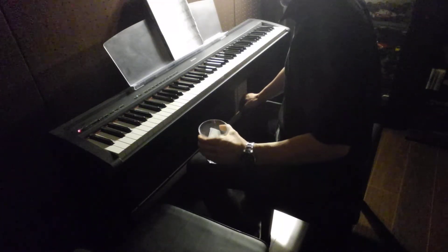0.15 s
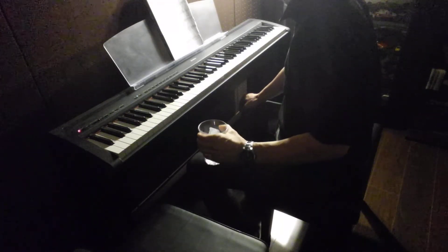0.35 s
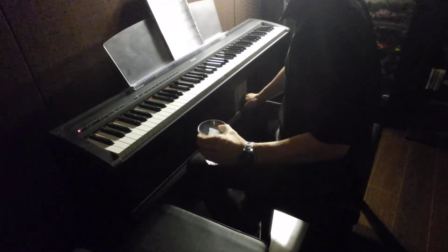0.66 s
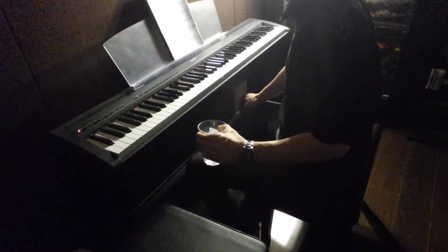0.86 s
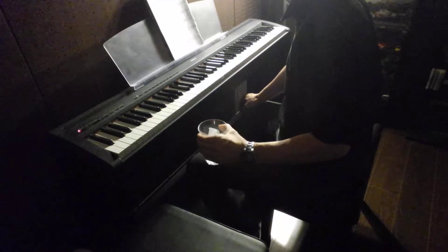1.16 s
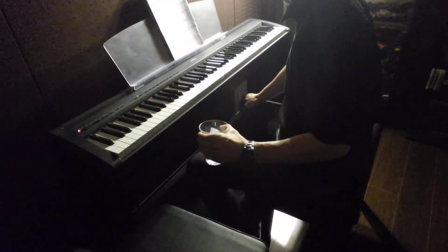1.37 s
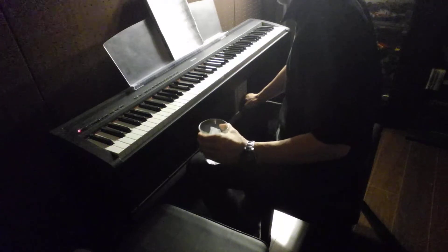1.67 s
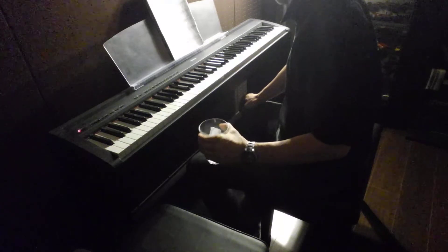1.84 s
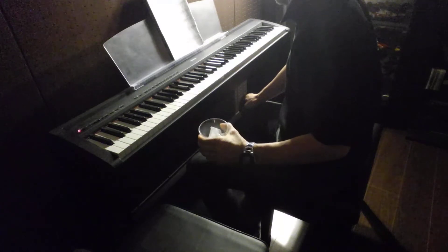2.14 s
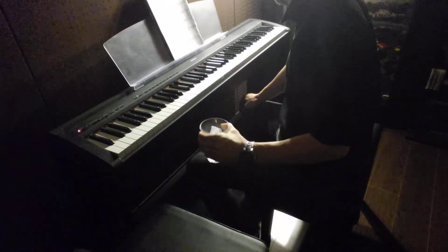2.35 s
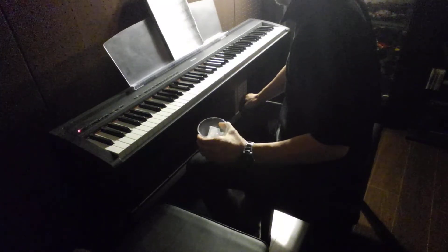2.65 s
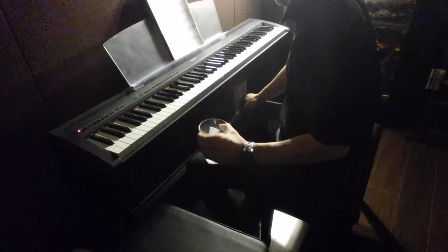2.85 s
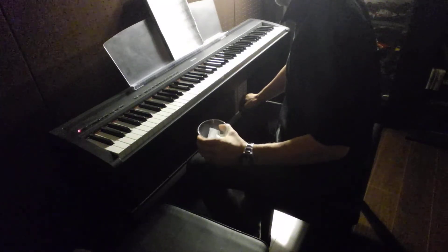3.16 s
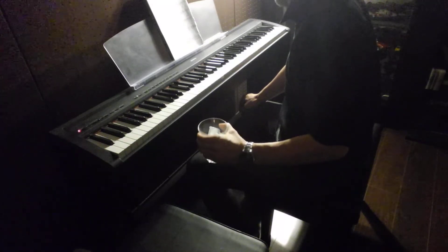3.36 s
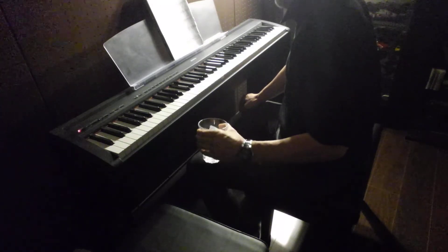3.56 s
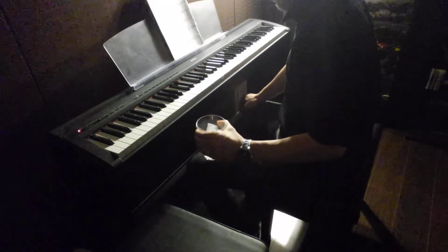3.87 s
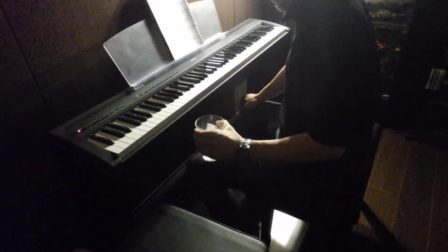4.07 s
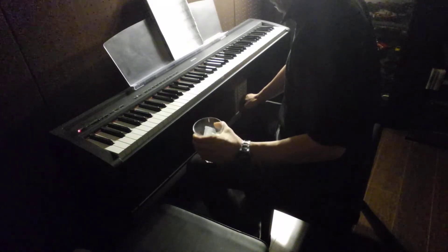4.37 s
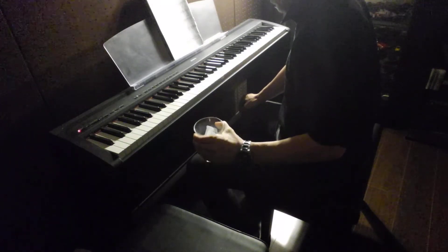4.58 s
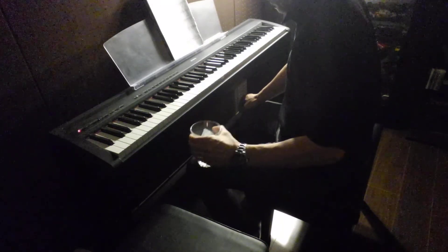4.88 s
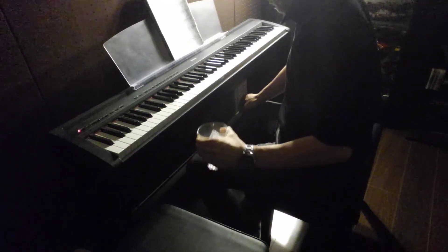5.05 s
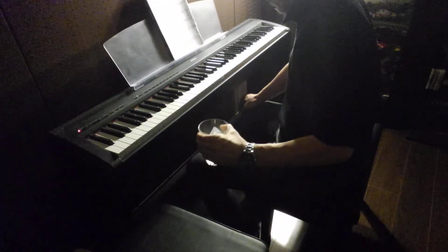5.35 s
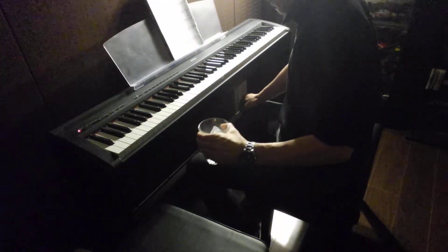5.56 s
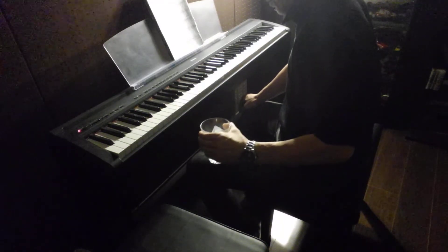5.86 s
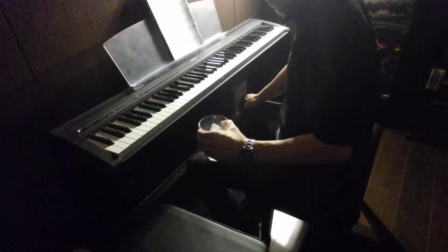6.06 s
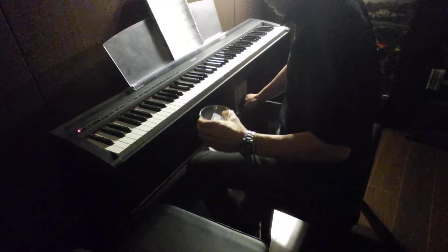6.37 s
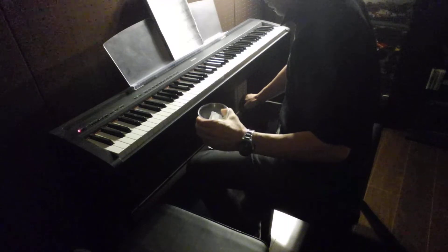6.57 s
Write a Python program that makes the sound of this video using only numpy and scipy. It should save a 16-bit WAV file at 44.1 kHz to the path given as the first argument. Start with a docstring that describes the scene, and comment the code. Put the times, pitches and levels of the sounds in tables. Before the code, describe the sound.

Close, dense clinking of ice in a gripped drinking glass, shaken hard for over four seconds, then gently swirled over faint room hum.

```python
"""Ice cubes knock about in a hand-held glass, shaken hard in a small soft room that hums throughout.
Each blow is a knock of ice, a short ring of the gripped glass and a snap of noise; light touches crowd round it.
A metal wristband soon joins with short ticks of noise, then air gurgles between the cubes as gliding tones.
After about four and a half seconds the hand only swirls the glass gently, and the blows become much softer.
The room answers faintly all along, with sparse echoes that die away."""
import sys
import numpy as np
from scipy import signal
from scipy.fft import rfft, irfft
from scipy.io import wavfile
from scipy.ndimage import uniform_filter1d

SR = 44100
rng = np.random.default_rng(int(sys.argv[2]) if len(sys.argv) > 2 else 0)


def dump_mix(stems):
    """Bounce the given channels to the path in sys.argv[1] as a 16-bit WAV at rate SR."""
    frames = np.atleast_2d(stems).T  # one column per channel
    limited = np.clip(frames, -1, 1)  # hard clip at full scale
    pcm = np.round(limited * 32767).astype(np.int16)
    wavfile.write(sys.argv[1], SR, pcm)


N = 296352  # length in samples


def gain_of(db):
    """Turn decibels into a plain multiplier."""
    return 10 ** (np.asarray(db) / 20)


def evened(x):
    """Scale a sound to an average (RMS) level of 1."""
    return x / np.sqrt(np.mean(x ** 2) + 1e-20)


def peaked(x):
    """Scale a sound so its highest peak is 1."""
    return x / (abs(x).max() + 1e-20)


def read(points, hz):
    """Read a table of (Hz, value) at any pitch, on a logarithmic pitch scale."""
    f, value = np.transpose(points)
    return np.interp(np.log(hz + 1), np.log(f + 1), value)


def add(mix, s, sound):
    """Add a sound into the mix, starting at s seconds."""
    part = mix[round(s * SR):][:len(sound)]
    part += sound[:len(part)]


def colour(x, points):
    """Filter with the given spectrum, never sounding ahead of its input (minimum phase)."""
    hz = abs(np.fft.fftfreq(4096, 1 / SR))
    log_gain = np.log(gain_of(read(points, hz)))
    taps = np.fft.ifft(np.exp(np.conj(signal.hilbert(log_gain)))).real[:2048]
    return signal.oaconvolve(x, taps)[:len(x)]


def ring(t, hz, t60, rise, glide=0):
    """A tone with a soft start that drops 60 dB in t60 seconds; glide bends the pitch up as it fades."""
    fade = gain_of(-60 * t / t60) * (1 - np.exp(-t / rise))
    return fade * np.sin(2 * np.pi * hz * t * (1 + glide * t))


# The tone of the room and microphone noise. Each row: pitch in Hz, relative level in dB.
HUM_TONE = [(12, 3), (33, -2.5), (75, -10), (157, -3.5), (242, -12.5), (503, -13), (700, -19.5),
            (1200, -18.5), (3000, -29.5), (5000, -34), (9300, -41), (16000, -39.5)]


def hum():
    """Steady room rumble and microphone hiss: random noise shaped by pitch."""
    hz = np.fft.rfftfreq(N, 1 / SR)
    noise = irfft(rfft(rng.standard_normal(N)) * gain_of(read(HUM_TONE, hz)), N)
    return gain_of(-60.5) * evened(noise)


# How hard the hand moves the glass, as the middle level of the softer blows.
# Each row: time in seconds, peak level in dB before later filters.
VIGOUR = [(0, -39.5), (1.1, -42), (1.7, -40), (3.3, -42.5), (3.7, -42.5), (4.4, -32), (4.65, -67),
          (5.2, -60), (6.0, -66), (6.72, -59)]


def vigour_db(s):
    """The hand's strength at s seconds, sliding smoothly between the rows."""
    return np.interp(s, *np.transpose(VIGOUR))


def slackness_db(s):
    """How far the hand has eased off from a full shake: 0 or below."""
    full_shake_db = -45.5
    return np.minimum(vigour_db(s) - full_shake_db, 0)


def lesser_blows():
    """Cubes also knock softly at uneven moments, as hard as the hand moves."""
    per_s, spread_db = 28, 7
    slots = np.arange(0, N / SR - .1, 1 / per_s)
    when, size, low, high, hard = rng.random((len(slots), 5)).T
    s = slots + when / per_s  # one blow somewhere in each slot
    peak_db = vigour_db(s) + spread_db * (2 * size - 1)
    low_hz = 2200 + (3100 - 2200) * low
    high_hz = 3440 + (4700 - 3440) * high
    high_db = -19 + (-8 + 19) * hard
    return np.transpose([s, peak_db, low_hz, high_hz, high_db])


# The clear blows of cubes on the glass or one another. Each row: start in seconds, peak level in dB
# before the snap and later filters, lower and upper pitch of the ice knock in Hz,
# upper level relative to the lower in dB before a fixed lift.
CLEAR_BLOWS = [(0.0059, -23.5, 2460, 4300, -6.5), (0.0985, -24.5, 2430, 4370, -3),
               (0.1147, -25, 2770, 4300, 1), (0.2371, -30, 2600, 3830, -13), (0.2596, -24, 2500, 3800, -3),
               (0.2688, -24.5, 3100, 3530, -8), (0.274, -24.5, 2630, 3570, -10),
               (0.317, -29, 2180, 4580, -12), (0.3345, -33, 2200, 3770, -15),
               (0.3516, -27.5, 2440, 3460, -19), (0.3885, -25, 2540, 3480, -20),
               (0.4041, -28.5, 2580, 3450, -6), (0.4126, -32, 2930, 3470, -8),
               (0.4288, -22, 2680, 4620, -6), (0.4397, -27.5, 2620, 4620, 1), (0.451, -21, 2450, 4930, -6),
               (0.488, -25, 2340, 4600, -5), (0.584, -29.5, 2660, 3350, 6), (0.6022, -29, 2350, 4620, -6),
               (0.6128, -24.5, 2330, 4800, -1.5), (0.6387, -33, 2800, 4770, -6),
               (0.684, -35, 2770, 3420, -8), (0.7508, -28, 2400, 3850, -1), (0.7592, -23.5, 2520, 4520, 0),
               (0.7934, -29, 2310, 3400, 2), (0.8271, -29, 2730, 3830, -8),
               (0.8917, -19.5, 2400, 3780, -12), (0.915, -20.5, 2540, 4620, -11),
               (0.9282, -19.5, 2910, 3630, -5), (0.9359, -30, 2660, 4620, -10),
               (0.9465, -24, 2300, 3490, -7), (0.9787, -24, 2760, 4570, -13),
               (0.9977, -30.5, 3000, 3690, -7), (1.0271, -34, 2430, 3520, -11),
               (1.0452, -25.5, 2360, 3370, -7), (1.0736, -21.5, 2620, 3480, -17),
               (1.0893, -16.5, 2260, 4700, -9), (1.1099, -20.5, 2400, 3360, -7),
               (1.155, -25, 2400, 3540, -1), (1.1997, -33, 2800, 3430, -8), (1.2471, -31, 2500, 5200, -17),
               (1.252, -26.5, 2610, 4640, 0), (1.2621, -28, 2950, 3450, -12),
               (1.2665, -22, 2350, 4700, -4.5), (1.405, -24.5, 3020, 4100, -9),
               (1.4222, -22, 2580, 3470, 5), (1.44, -28.5, 2560, 4300, 6), (1.4985, -36.5, 2440, 3630, -4),
               (1.5727, -26, 3400, 5550, -3), (1.586, -31, 3330, 3400, 4), (1.599, -22, 2310, 4750, 2),
               (1.711, -30.5, 2530, 3530, -9), (1.7458, -23, 3010, 3570, -4),
               (1.7576, -24.5, 2950, 3370, 3), (1.7733, -23, 2280, 4800, -15),
               (1.8117, -22, 2190, 4600, -5), (1.8877, -30.5, 2540, 3280, -17),
               (1.8987, -28, 2400, 3800, -9), (1.931, -24.5, 2310, 3540, 0), (1.9416, -24.5, 3000, 3230, 2),
               (1.9476, -22.5, 2490, 4700, -2), (1.962, -33, 2360, 4340, -4), (1.9895, -26, 2730, 4620, -8),
               (2.0037, -31.5, 2700, 3760, -1), (2.0208, -32, 2220, 4150, -8),
               (2.068, -34.5, 2860, 3330, -8), (2.1053, -23.5, 2300, 5290, 3), (2.1155, -23, 2260, 3830, 5),
               (2.1272, -36, 2400, 4620, 4), (2.139, -30, 2350, 4400, 8), (2.1698, -23.5, 2230, 4540, -4),
               (2.258, -33, 2310, 3300, -1), (2.2796, -20, 2410, 4850, -9), (2.2887, -28.5, 2680, 4560, 7),
               (2.301, -23, 2310, 5220, -9), (2.3365, -23.5, 2180, 4600, -5), (2.4367, -33, 3050, 5540, -4),
               (2.4492, -25, 2540, 4330, -4), (2.4632, -26, 2310, 4740, -7), (2.4965, -31, 2280, 4750, -9),
               (2.5246, -30, 2420, 3370, -12), (2.586, -28.5, 2350, 4850, -8),
               (2.6138, -23, 2400, 3800, -4), (2.6307, -23.5, 2320, 4980, 0.5),
               (2.6684, -27, 2230, 3500, -7), (2.6936, -31, 2220, 3470, -10),
               (2.7015, -29, 2240, 4060, -18), (2.7696, -22, 2310, 3860, -3),
               (2.802, -21, 2640, 3480, -7.5), (2.8392, -33, 2420, 3940, -3), (2.8639, -37, 2840, 3500, -9),
               (2.9214, -38, 2440, 4610, -4), (2.9444, -26.5, 2580, 5400, -13),
               (2.9531, -23, 2250, 4750, 6), (2.9636, -27.5, 3000, 4730, -4), (2.9803, -26, 2340, 4640, 3),
               (3.0434, -31, 2370, 4150, -13), (3.0617, -27.5, 2540, 3500, -11),
               (3.0974, -36.5, 2300, 3800, -15), (3.1137, -35, 3000, 4450, 1),
               (3.1245, -25.5, 2400, 6100, -4), (3.138, -22, 2260, 5270, -9), (3.1527, -20, 2950, 4700, -3),
               (3.187, -24.5, 2240, 4600, -8), (3.2094, -31, 2680, 3480, -13),
               (3.236, -31.5, 2620, 4370, -15), (3.2779, -32.5, 2320, 4730, -6),
               (3.2922, -27, 2360, 4620, -13), (3.3, -26.5, 2640, 4620, -8),
               (3.3091, -26.5, 2910, 4620, -3), (3.3191, -24, 2270, 4880, -8), (3.35, -35, 2820, 4640, -7),
               (3.384, -34.5, 2440, 3300, -8), (3.436, -37, 2370, 4700, -4), (3.4663, -30, 2780, 5600, -5),
               (3.4788, -28, 2750, 4450, -8), (3.49, -25.5, 2310, 5030, -10),
               (3.5152, -27.5, 2370, 3970, -9), (3.6365, -29, 2590, 4920, -9),
               (3.6476, -27, 2200, 4840, -2), (3.724, -34.5, 2600, 3480, -11),
               (3.8027, -24, 2770, 3610, -6.5), (3.825, -28, 2340, 4800, 0), (3.8553, -28, 2540, 3670, -9),
               (3.9558, -25.5, 2700, 5610, -8), (3.9812, -27, 2800, 3570, 4.5),
               (3.9881, -23.5, 2840, 4730, -1), (4.02, -33, 2250, 3670, -2),
               (4.0737, -28.5, 2640, 3640, -5), (4.13, -28, 2680, 5970, -4), (4.1462, -27, 2200, 5000, -1),
               (4.1558, -24, 2870, 4960, -4), (4.1646, -24, 2760, 5020, -1.5),
               (4.203, -23.5, 2770, 3800, -0.5), (4.2341, -27, 2780, 4160, -7),
               (4.2916, -29.5, 2360, 4930, -4), (4.3232, -26, 2290, 4600, 0), (4.3373, -24, 3000, 3520, 6),
               (4.3442, -31, 2190, 4850, 8), (4.3858, -23.5, 2910, 3800, -3), (4.4682, -38, 2330, 3620, 9),
               (4.4988, -30.5, 2920, 3650, 8), (4.5084, -25, 2600, 4830, -4.5),
               (4.592, -48, 2540, 3700, -8), (4.6184, -54, 2780, 3520, -6), (4.6773, -45, 2780, 3480, -6),
               (4.7554, -41, 2290, 3520, -20), (4.7618, -32.5, 2200, 3480, -2),
               (4.7762, -32.5, 2870, 3800, -6), (4.8439, -48, 3010, 3320, -1),
               (4.8669, -43.5, 3150, 3300, -8), (4.883, -38, 2800, 3600, -3), (4.9322, -48, 2100, 3430, -4),
               (4.965, -39.5, 2740, 3450, -21), (4.9949, -39, 2700, 3400, -7),
               (5.0221, -37.5, 3260, 4200, -6), (5.0454, -37.5, 2540, 3500, -4),
               (5.0628, -32.5, 2440, 3300, -3.5), (5.1172, -47, 2600, 5690, -12),
               (5.1595, -38, 2660, 3800, -4), (5.1652, -32.5, 2820, 3710, -3), (5.201, -45, 2180, 3840, -6),
               (5.2376, -33, 1930, 3750, -2), (5.2475, -30.5, 1970, 3560, -6),
               (5.2854, -34, 2830, 3450, -5), (5.31, -33, 2780, 3440, -6), (5.347, -38.5, 2820, 4920, -4),
               (5.3598, -43, 3250, 3500, -5), (5.4202, -41.5, 2770, 3560, -8),
               (5.4909, -41, 2940, 3780, -16), (5.5149, -30, 2860, 5040, -6.5),
               (5.637, -37, 2730, 4850, -12), (5.6989, -34.5, 2170, 3430, -14),
               (5.7402, -38, 2040, 3380, -10), (5.746, -31, 2010, 3300, -21), (5.754, -32, 2190, 3520, 5),
               (5.7672, -32, 2220, 3400, -7), (5.7903, -32, 2900, 3480, -8), (5.871, -48, 2700, 6000, -13),
               (5.8916, -37, 2340, 3770, -16), (5.9693, -35, 1960, 3320, -11),
               (5.989, -32, 2010, 3370, -13), (5.9959, -32, 2190, 4860, -1), (6.0529, -39.5, 2860, 4100, 6),
               (6.0882, -44.5, 2910, 3530, -8), (6.1528, -53, 3020, 3300, -6),
               (6.1599, -45, 2800, 3400, -4), (6.179, -37.5, 2170, 4300, -17),
               (6.2216, -42, 2800, 3380, -11), (6.3377, -43, 2840, 3200, -8), (6.4086, -44, 2200, 3250, -9),
               (6.4435, -48, 2180, 3300, -10), (6.4523, -39, 2200, 3200, -10),
               (6.5365, -56, 3090, 3420, -9.5), (6.559, -46, 2200, 3950, -11),
               (6.6485, -45.5, 2060, 3320, -34), (6.7002, -50, 3120, 3990, -4)]


def all_blows():
    """The clear blows together with the softer ones between."""
    return np.vstack([CLEAR_BLOWS, lesser_blows()])


# The tone of the contact snap. Each row: pitch in Hz, gain in dB.
SNAP_TONE = [(800, -26), (1900, -17.5), (2600, 5.5), (6300, -0.5), (7100, -13), (10000, -18.5),
             (16000, -27.5)]


def snap(blows, t60):
    """The contact itself: a very short burst of hiss at each blow."""
    fade = gain_of(-60 * np.arange(600) / SR / t60)
    envelope = signal.oaconvolve(blows, fade)[:N]
    return colour(envelope * rng.standard_normal(N), SNAP_TONE)


# The glass damped by the grip, one row per ringing mode.
# Each row: pitch in Hz before the ice shifts it, relative level in dB, time to drop 60 dB in seconds.
GLASS = [(1420, 2, 0.023), (1690, 1, 0.024), (2190, -9.5, 0.14), (2310, -1, 0.089), (2540, -8.5, 0.057),
         (2770, -8, 0.1), (2986, 3.5, 0.015), (3213, -8, 0.017), (3480, 0.5, 0.013), (3780, -13.5, 0.059),
         (4300, -14.5, 0.063), (4620, -11.5, 0.087), (5000, -0.5, 0.016), (6100, -38, 0.007),
         (6165, -9.5, 0.011), (2400, -22, 0.059)]


def clinks(hits):
    """Each blow is a two-pitched knock of ice, the glass modes near those pitches, and a tiny snap."""
    out, snaps, t = np.zeros(N), np.zeros(N), np.arange(3500) / SR
    hz, db, t60 = np.transpose(GLASS)
    # ice leaning on the wall shifts the modes, in eight different ways
    loads = 1 + .012 * rng.standard_normal((8, len(GLASS), 1))
    modes = ring(t, hz[:, None] * loads, t60[:, None], 0.00037)
    leaning = rng.integers(0, len(loads), len(hits))
    spots = rng.standard_normal((len(hits), len(GLASS)))  # where the blow lands sets each mode's share
    for (s, peak_db, low_hz, high_hz, high_db), spot, k in zip(hits, spots, leaning):
        near_low = gain_of(-25 * abs(np.log2(hz / low_hz)))  # modes fade with distance in octaves
        near_high = gain_of(high_db + 29.0 - 15.4 * abs(np.log2(hz / high_hz)))
        shares = np.sign(spot) * gain_of(db + 3.6 * spot) * (near_low + near_high)
        glass = shares @ modes[k]
        low_t60 = 0.014 * gain_of(-.3 * min(high_db, 0))  # soft blows sing longer
        low_knock = ring(t, low_hz, low_t60, 0.00088)
        high_knock = gain_of(high_db + 7.5) * ring(t, high_hz, 0.007, 0.00037)
        blow = peaked(low_knock + high_knock) + gain_of(-2.0) * peaked(glass)
        add(out, s, gain_of(peak_db) * peaked(blow))
        add(snaps, s + .0005, gain_of([peak_db + .6 * high_db - 2]))
    return out + snap(snaps, 0.018)


# How strongly light touches sound at each pitch. Each row: pitch in Hz, gain in dB.
TOUCH_TONE = [(1000, -52), (1400, -15), (1950, -6), (2250, 5), (4600, -4.5), (6300, -16.5), (7000, -46)]


def jostle(hits):
    """Light touches, each a cluster of short tones, glass ring and hiss, crowd round every blow."""
    blows, t = np.zeros(N), np.arange(12000) / SR
    for s, peak_db, *_, high_db in hits:  # hard blows unsettle the cubes most
        add(blows, s, gain_of([peak_db + .3 * min(high_db, 0) - 17]) ** 2)
    # a quick rush after each blow, then a quieter, slower tail
    settling = gain_of(-60 * t / 0.073) * (1 - np.exp(-t / 0.0018)) + gain_of(-11.0 - 60 * t / 0.29)
    # cubes scrape along just before they strike: add up the blows of the next 900 samples
    upcoming = uniform_filter1d(blows, size=900, origin=-449) * 900
    slide_gain = gain_of(-3.5 + 0.91 * slackness_db(np.arange(N) / SR))  # less sliding in a slack hand
    sliding = slide_gain ** 2 * upcoming
    unrest = np.sqrt(abs(signal.oaconvolve(blows, settling)[:N] + sliding))

    happens = rng.random(N) < 600 / SR  # about 600 touches a second
    size = gain_of(4.2 * np.minimum(rng.exponential(1, N), 3)) * happens
    pitches = np.geomspace(1000, 7000, num=24)
    kinds = rng.integers(0, len(pitches), (3, N))  # three pitch draws for every touch
    tones = np.zeros(N)
    for k, hz in enumerate(pitches):
        touch = ring(t[:1500], hz, 35 / hz, 0.001)  # dies within a set number of cycles
        struck = size * (kinds == k).any(axis=0)
        sound = signal.oaconvolve(struck, touch / np.linalg.norm(touch))[:N]
        tones += gain_of(read(TOUCH_TONE, hz)) * sound
    hz, db, t60 = np.transpose(GLASS)
    glass_ring = gain_of(db) @ ring(t[:5000], hz[:, None], t60[:, None], 0.00047)
    rung = signal.oaconvolve(size, glass_ring)[:N]
    hiss = snap(size, 0.0061)
    touches = evened(tones) + gain_of(-11) * evened(rung) + gain_of(-9.5) * evened(hiss)
    return unrest * evened(touches)


# A slight dulling of the glass and ice. Each row: pitch in Hz, gain in dB.
DULLING = [(1500, -1.5), (1950, -5), (2280, -4), (2600, -3.5)]


def dulled(x):
    """The glass and ice sound is dulled slightly, most near 1950 Hz, less below 1500 Hz."""
    return colour(x, DULLING)


# Links of the wristband. Each row: start in seconds, peak level in dB before later filters.
TICKS = [(0.0434, -41), (0.1, -42.5), (0.2797, -46), (0.4512, -32), (0.5846, -41), (0.613, -38.5),
         (0.9777, -46), (1.0106, -46), (1.0286, -45), (1.269, -44), (1.5985, -40), (1.663, -45.5),
         (1.7712, -41), (1.95, -39), (2.1051, -55), (2.215, -48), (2.6299, -51), (2.801, -44),
         (3.0535, -47), (3.1213, -47), (3.1533, -39), (3.386, -51), (3.4889, -35.5), (3.709, -53),
         (3.8801, -50), (4.165, -35.5), (4.2028, -60), (4.3855, -51), (4.51, -45), (4.56, -48),
         (4.721, -51), (4.919, -51), (5.0469, -45), (5.166, -50), (5.3613, -37), (5.541, -47),
         (5.7917, -50), (5.8098, -39), (6.0645, -44), (6.134, -47.5), (6.2643, -50.5), (6.3625, -50),
         (6.4844, -50), (6.5979, -56), (6.7037, -52)]
# The tone of one tick. Each row: pitch in Hz, gain in dB before the lower treble is adjusted.
LINK_TONE = [(4000, -23.5), (8000, -9), (11000, -23), (17000, -25)]


def wristband():
    """Very short ticks of fading noise."""
    out, t = np.zeros(N), np.arange(400) / SR
    hz, db = np.transpose(LINK_TONE)
    noises = rng.standard_normal((len(TICKS), 400))
    for (s, peak_db), noise in zip(TICKS, noises):
        # louder ticks, and those during hard shaking, are given more lower treble,
        # as from clinks struck with them
        lower_treble_db = 1.3 * (peak_db + 37.5) + 0.53 * slackness_db(s)
        shape = np.transpose([hz, db + lower_treble_db * (hz < 10000)])
        tick = colour(noise * gain_of(-60 * t / 0.0059), shape)
        add(out, s, gain_of(peak_db) * peaked(tick))
    return out


# Hollow gurgles between the cubes.
# Each row: start in seconds, peak level in dB before later filters, starting pitch in Hz.
GURGLES = [(0.3166, -46, 1710), (0.4273, -44, 1390), (0.7228, -47, 1420), (1.2, -49, 1400),
           (1.8304, -47, 1410), (1.9306, -43, 1810), (2.0684, -43, 1800), (2.5916, -43.5, 1770),
           (2.7692, -44, 1710), (3.279, -44, 1430), (3.3763, -48, 1420), (3.438, -45, 1500),
           (3.462, -43, 1500), (3.5459, -48, 1410), (3.724, -46.5, 1450), (3.9533, -40, 1670),
           (4.05, -47.5, 1400), (4.467, -44.5, 1780), (4.7862, -40, 1320), (4.864, -48.5, 1630),
           (4.9316, -48.5, 1620), (4.9658, -42, 1650), (4.9842, -47, 1610), (4.999, -47, 1680),
           (5.0091, -40.5, 1680), (5.021, -39, 1430), (5.0623, -44, 855), (5.17, -49.5, 870),
           (5.2103, -46, 1340), (5.2368, -41, 1676), (5.248, -37.5, 1620), (5.2945, -44, 1780),
           (5.3156, -43.5, 1460), (5.348, -48, 1320), (5.478, -51, 1580), (5.5155, -45.5, 1860),
           (5.6, -49, 1400), (5.641, -42.5, 1420), (5.778, -49, 1420), (5.8093, -50, 980),
           (5.872, -49, 1620), (5.894, -50, 1420), (5.9696, -44, 1690), (5.9847, -56, 1610),
           (6.0634, -50.5, 1410)]


def gurgles():
    """Pockets of air ring briefly, rising a little, with a close neighbour and a shorter overtone."""
    out, t = np.zeros(N), np.arange(5000) / SR
    for s, peak_db, hz in GURGLES:
        t60 = 30.5 / hz  # drops 60 dB within 30.5 cycles
        pocket = ring(t, hz, t60, 0.00089, glide=1.8)
        neighbour = gain_of(-5) * ring(t, 1.07 * hz, t60, 0.003)
        overtone = gain_of(-2.0) * ring(t, 0.88 * hz + 650, 0.46 * t60, 0.00062)
        add(out, s, gain_of(peak_db) * peaked(pocket + neighbour + overtone))
    return out


# How long the room answers. Each row: pitch in Hz, time to drop 60 dB in seconds.
ROOM_FADE = [(800, 0.14), (2500, 0.1), (6000, 0.14), (14000, 0.091)]


def room(x):
    """Sparse echoes, each band dying at its own speed; the moving glass drifts between three paths."""
    at, t, out = np.arange(120, SR // 3 - 20, 20), np.arange(N) / SR, np.zeros(N)
    for k in range(3):
        taps = np.zeros(SR // 3)
        taps[at + rng.integers(0, 20, len(at))] = rng.choice([-1., 1.], len(at))  # random sign
        hz, lag, bands = signal.stft(taps, SR, nperseg=256)
        fade = gain_of(-60 * lag / read(ROOM_FADE, hz)[:, None])
        tail = signal.istft(bands * fade, SR, nperseg=256)[1]
        share = np.sqrt(2 / 3) * np.cos(2 * np.pi * (4.3 * t + k / 3))  # drifts 4.3 times a second
        out += signal.oaconvolve(x * share, tail / np.linalg.norm(tail))[:N]
    return out


def scene():
    """Mix the glass, air and wristband with their echo and the hum."""
    hits = all_blows()
    glass = dulled(clinks(hits) + jostle(hits))
    air = gurgles()
    band = wristband()
    echo = room(gain_of(-8.0) * glass + gain_of(-2.5) * air + gain_of(-4) * band)
    return (glass + air + band + echo + hum())[None]


# The microphone's uneven treble. Each row: pitch in Hz, gain in dB.
MICROPHONE = [(9000, 1), (11600, -2), (12900, 8), (14000, 0.5), (15400, 11)]


def record(dry):
    """The microphone's uneven treble, then a cut of everything above about 15.8 kHz."""
    heard = colour(dry[0], MICROPHONE)[None]
    low_pass = signal.firwin(511, 15780, window=("kaiser", 9), fs=SR)
    return signal.oaconvolve(heard, low_pass[None], "same")


dry = scene()
out = record(dry)
dump_mix(out)
```